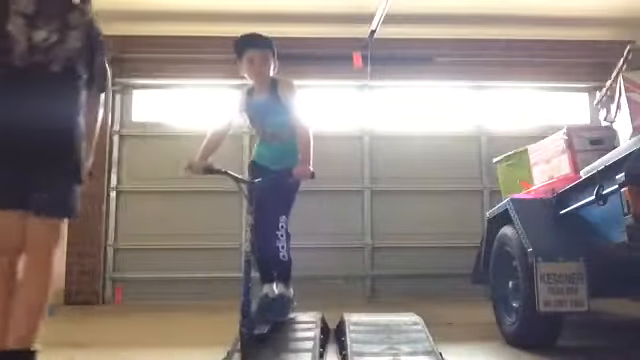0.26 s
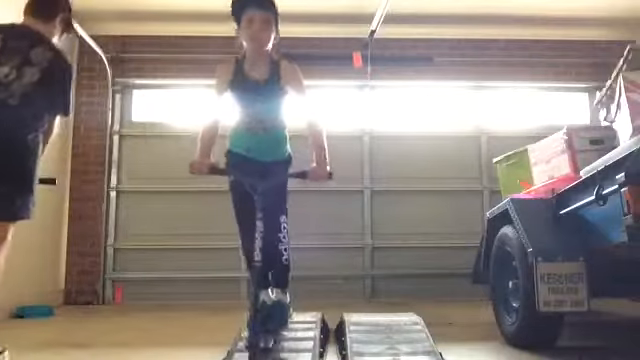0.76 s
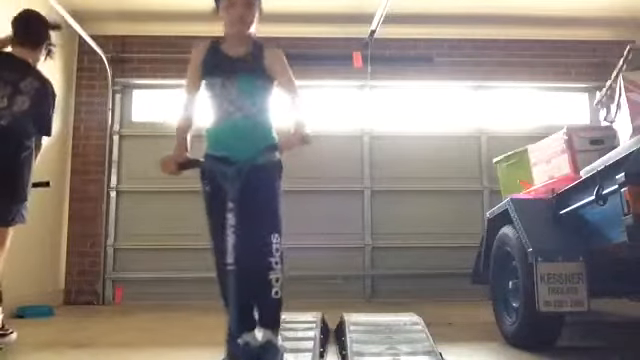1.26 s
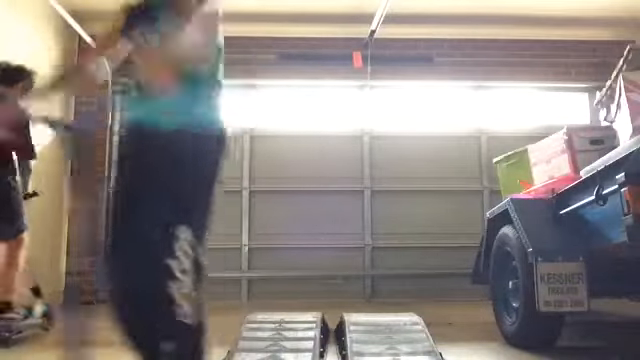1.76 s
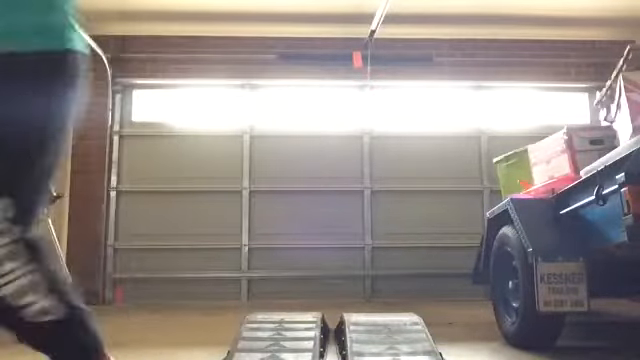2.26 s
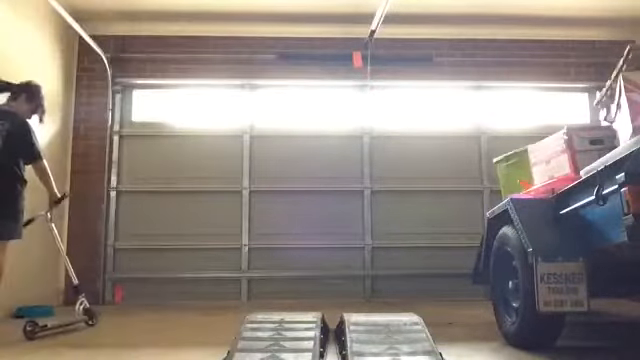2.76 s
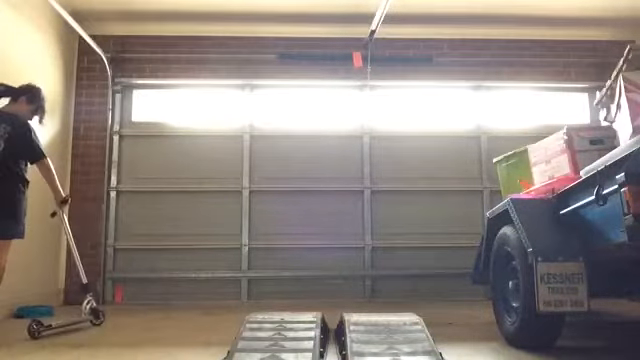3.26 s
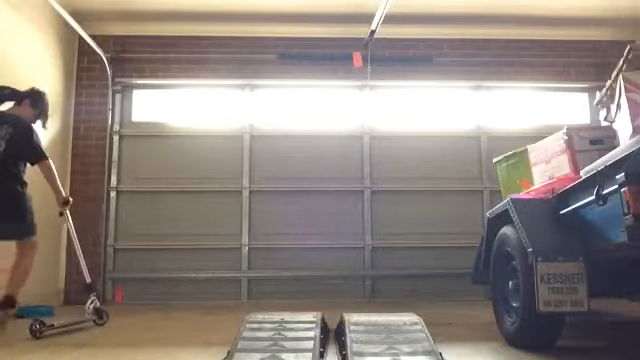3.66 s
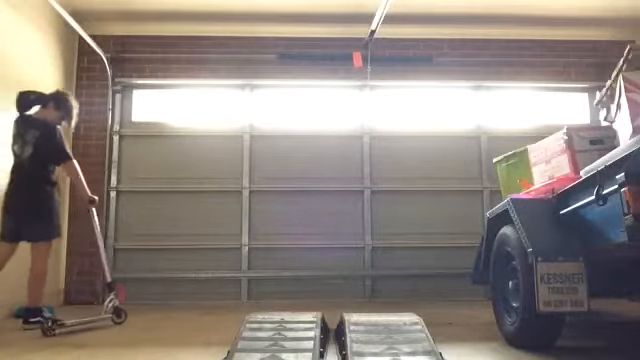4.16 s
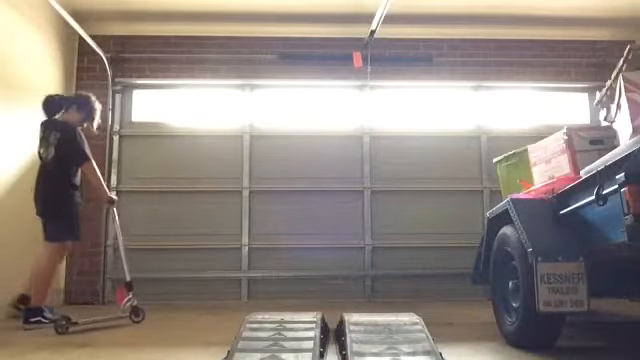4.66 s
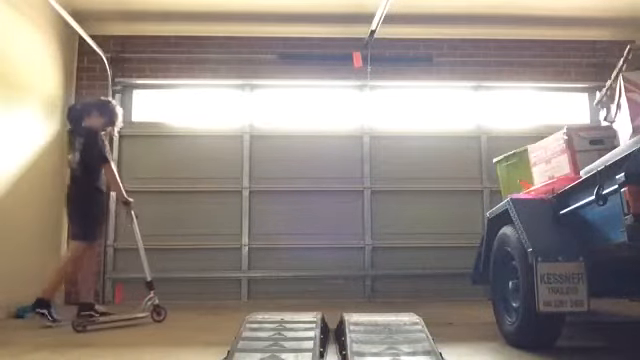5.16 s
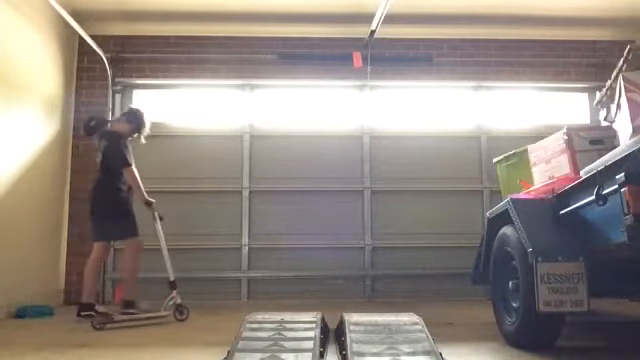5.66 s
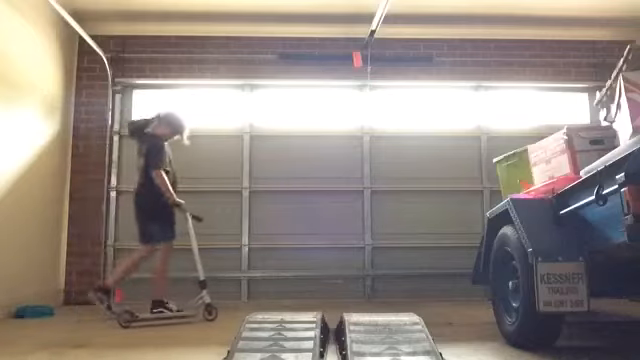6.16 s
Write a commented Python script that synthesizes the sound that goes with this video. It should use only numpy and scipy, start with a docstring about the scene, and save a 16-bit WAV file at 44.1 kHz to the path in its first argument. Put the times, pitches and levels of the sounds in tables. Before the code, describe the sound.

A bare garage with a faint, steady, low hush and about a second of hard-walled echo. From 0 to 0.7 s, a quick run of hollow metal ramp knocks, strongest at first, thins out with soft shoe scuffs. Around 0.85 s a wheel rumbles unevenly over the ramp, swelling into a heavy double clank at 1.2 s with a deep thump through the slab. A softer scuff comes at 1.5 s, a crisp wheel knock at 1.7 s, then a hard, clattering deck hit at 2.43 s with a short thump. Brief bright shoe slides at 2.9 s precede a duller frame knock at 3.35 s and a sharp metallic bang at 3.8 s. After faint scuffs, small slides return at 4.7 and 4.9 s. The loudest late frame bang rings at 5.17 s, then its echo fades into quiet air, faint scuffs and a tiny wheel tick at 6.15 s.

```python
"""In an echoing garage, kick scooters knock on the concrete floor and on hollow metal ramps.
A wheel rolls over a ramp and drops off it, frames are banged down, shoes scuff and slide.
Each short contact is a burst of clicks that rings the thing struck, then fills the bare room.
Low thumps reach the microphone through the slab, and the steady air lies under everything."""
import sys
import numpy as np
from scipy import signal
from scipy.fft import rfft, irfft
from scipy.io import wavfile
from scipy.ndimage import uniform_filter1d

SR = 44100
rng = np.random.default_rng(int(sys.argv[2]) if len(sys.argv) > 2 else 0)


def unload_audio(sound):
    """Save the sound as a 16-bit wav file, at the path given as the first command line argument."""
    columns = np.transpose(np.atleast_2d(sound))
    # keep every value between -1 and 1, then stretch to whole-number steps
    steps = np.round(np.clip(columns, -1, 1) * 32767)
    wavfile.write(sys.argv[1], SR, steps.astype(np.int16))


N = 282571
SIZE = 16384  # samples in one contact or in the roll, about 0.37 s
EDGE_HZ = 15500  # top of the band
WEIGHT_HZ, HARDNESS_HZ = 250, 1000  # weight acts below, hardness above
HOLLOW_HZ, HOLLOW_OCTAVES = 750, 0.77  # centre and spread of the hollow band
HUSH_DB = -59.5  # rms level of the air ahead of the microphone

# The steady air of the garage. Each row: frequency in Hz, relative level in dB per Hz.
HUSH_COLOUR = [(15, -50), (25, -24.5), (75, 5), (152, -2.5), (305, -4.5), (598, -3.5), (666, 0.5),
               (1170, -12), (1450, -5), (2560, -12), (4620, -18), (12200, -27.5), (15500, -35)]

# Contacts on the metal ramp, the shoe scuffs, wheel knocks, deck hits, shoe slides and frame hits.
# Each row: start in seconds, strength in dB, weight (extra bass) in dB, hollowness (extra around
# HOLLOW_HZ) in dB, hardness (extra treble) in dB per octave, contact time in seconds.
RAMP_HITS = [(0.0, -36, -6, 4, -6, 0.018), (0.01, -35.5, -3, -1, -4.5, 0.012),
             (0.029, -38.5, 8, 9.5, 3.5, 0.015), (0.061, -43.5, 13, 1, 6, 0.021),
             (0.127, -40.5, 14, 8.5, 7, .012), (0.191, -45, 25, -20, 5, 0.02),
             (0.25, -49.5, 17, -1, 6, 0.02), (0.299, -48, 2, 2, 4.5, 0.059),
             (0.349, -39.5, 1, -2.5, 0, 0.032), (0.399, -54.5, -19, -2, 7.5, 0.019),
             (0.509, -51.5, 7.5, -1, 3, 0.054), (0.719, -57.5, -30, -4.5, -1, 0.012),
             (1.138, -51, 9, 6, 4, 0.014), (1.17, -44, -4, 8, 3, 0.0072), (1.194, -29.5, 7.5, 7, -6, 0.011),
             (1.22, -24, -3.5, -1.5, -1.5, 0.0077), (1.233, -38.5, -4, -6, -3, 0.016),
             (1.348, -45, -12, -11, -7, 0.043)]
SCUFFS = [(0.138, -45, 15, 1.5, 1, 0.065), (0.389, -40, 24.5, 5.5, -1, 0.033),
          (1.474, -48, 0, -2, -4, 0.038), (1.809, -57.5, -4, 0, 1.5, 0.027), (1.914, -57, -3, 0, -2, 0.035),
          (2.148, -62, 1, -6, 2.5, 0.014), (4.149, -71, 1, -26, 4, 0.041), (4.268, -59.5, 0, 10, 5, 0.036),
          (5.619, -61.5, -7, 3, 3, 0.048), (5.749, -60.5, -16, 3, 1.5, 0.032),
          (5.904, -57, -15, -4.5, 1, 0.023)]
WHEEL_KNOCKS = [(1.716, -39, -6, 5.5, -2.5, 0.0033), (1.734, -37.5, -4.5, 2, -2.5, 0.0018),
                (2.115, -59.5, 5, -4, 0, 0.014), (2.285, -60.5, -21, -3, 1, 0.0076),
                (5.08, -61, -7, 0, -4.5, 0.0035), (6.141, -61, 12.5, -5.5, 6, .0083),
                (6.158, -72, 4, 3, 9, .0074)]
DECK_HITS = [(2.426, -29, 1.5, 0.5, -0.5, 0.0065), (2.444, -33.5, -17, 5.5, 0.5, 0.0039),
             (2.464, -34, -25, -6, -4, 0.0059), (2.494, -40.5, -9, -5.5, -5, 0.01),
             (2.645, -48, -3, 4, 3, 0.017)]
SLIDES = [(2.933, -47, 1.5, 15.5, 0.0086, 0.023), (2.959, -48, -34, 6, 0.0052, 0.014),
          (4.662, -53.5, 3, -5.5, 0.0095, 0.036), (4.684, -51.5, -6, 2, 0.0021, 0.021),
          (4.899, -53, -6.5, 8, 0, 0.028), (4.924, -48, -4.5, -4.5, 0, 0.032)]
FRAME_HITS = [(3.337, -44, 27.5, 2.5, 3, 0.0072), (3.354, -37.5, -5, -2.5, -12, 0.0085),
              (3.374, -45, 0, -1, 0, 0.007), (3.439, -72, -10, 12, -2, 0.0034),
              (3.792, -30.5, -23.5, 1, 0.5, 0.0059), (3.806, -28, -7.5, -3.5, -2.5, .0082),
              (3.894, -46.5, 0, -5, -1, 0.0042), (4.075, -63, 0, -4, 8, 0.0119),
              (5.168, -24.5, 4, -7.5, 1, 0.0066), (5.181, -22.5, -10.5, -6.5, -1, 0.0043),
              (5.204, -34.5, -24, 1.5, -7.5, 0.0082)]

# The ordinary blow of each kind, before ringing. Each row: frequency in Hz, level in dB per octave.
RAMP_BLOW = [(55, -27), (140, -13.5), (330, -11), (720, -11), (1450, -12), (2800, -22.5), (5300, -31),
             (10500, -41)]
SCUFF_BLOW = [(55, -42.5), (140, -19), (330, -15), (720, -10.5), (1450, -15), (2800, -16), (5300, -27),
              (10500, -24.5)]
WHEEL_BLOW = [(55, -16), (140, -26), (330, -11.5), (720, -11), (1450, -12.5), (2800, -19), (5300, -31.5),
              (10500, -40.5)]
DECK_BLOW = [(55, -13), (140, -12), (330, -12), (720, -9), (1450, -12.5), (2800, -8.5), (5300, -16),
             (10500, -25)]
SLIDE_BLOW = [(55, -35.5), (140, -28.5), (330, -22.5), (720, -23), (1450, -22.5), (2800, -13.5),
              (5300, -10.5), (10500, -10)]
FRAME_BLOW = [(55, -47.5), (140, -34), (330, -28.5), (720, -10), (1450, -11), (2800, -11), (3300, -11.5),
              (3550, -15.5), (5300, -18.5), (10500, -29.5)]

# What each thing rings with. Each row: frequency in Hz, width in Hz, dB relative to the plain blow.
RAMP_MODES = [(112, 11.5, 4.5), (155.5, 11.2, 13), (257.5, 9.5, -6), (328, 32, -0.5), (434, 6.4, 9.5),
              (640, 98, 2), (710, 28, 5), (952, 41, 6), (2060, 220, 0.5), (3010, 490, 2)]
SOLE_MODES = [(3620, 4200, 6.3), (5500, 130, 1.3)]
WHEEL_MODES = [(442, 8, 11.6), (587, 46, 5.5), (736, 45, 8.3), (883, 68, 7.5), (1234, 35, 3.1),
               (3090, 45, 5.5)]
DECK_MODES = [(405, 110, 4.8), (672, 48, 11), (924, 60, 6.9), (1455, 136, 12.8), (1910, 58, 2),
              (2925, 87, 3.6), (3300, 13, 2.2), (4470, 21, 10.7), (8140, 530, 3)]
FRAME_MODES = [(274, 71, 5.2), (653, 15, 8), (705, 23, 9.4), (914, 13, 1.3), (1307, 35, 3),
               (1380, 29, 2.67), (1544, 41, 8.7), (2290, 13, 6.8), (2671, 25, 13.2), (2977, 90, 5.4),
               (3033, 40, 6), (3160, 9.6, 4.1), (3270, 11, 5.3), (3650, 14, 8), (3910, 110, 1),
               (4490, 68, 3.7), (5010, 120, 3.6), (5360, 17, 8), (7130, 24, 2.6), (9550, 330, 2.2)]

# A wheel rumbling over the ribs of the ramp. Each row: time in seconds, level in dB.
ROLL_LEVEL = [(0.84, -73), (0.884, -42.5), (0.936, -47), (0.976, -51.5), (1.01, -42), (1.15, -41),
              (1.22, -26)]
# Colour of that rumble. Each row: frequency in Hz, relative level in dB per Hz.
ROLL_COLOUR = [(29, -50), (50, -27), (96, -7.5), (163, -10), (523, -22), (699, -21.5), (1090, -41),
               (3000, -45), (3900, -71), (6600, -120)]

# Low thumps of the heavy blows through the slab.
# Each row: start in seconds, strength in dB, frequency in Hz, time to fall 60 dB in seconds.
SLAB_THUMPS = [(1.226, -7.5, 151, 0.23), (2.428, -12, 154, 0.051), (2.47, -26, 83, 0.064),
               (3.335, -31, 71, 0.1), (5.162, -35.5, 90, .12)]

# Echo of the bare garage. Each row: frequency in Hz, time to fall 60 dB in seconds.
GARAGE_DECAY = [(60, 0.56), (150, 0.35), (350, 0.93), (700, 0.8), (1000, 0.86), (1500, 0.9), (2100, 0.94),
                (2900, 0.89), (3800, 0.84), (5500, 0.69), (8000, 0.55), (14000, 0.34)]

# The microphone's response. Each row: frequency in Hz, gain in dB.
MICROPHONE = [(20, -22), (50, -1.5), (9000, 0), (12500, 1), (15500, -11.5)]


def gain_of(db):
    """Turns dB into a plain gain."""
    return 10 ** (np.asarray(db) / 20)


def evened(x):
    """Scales to rms 1."""
    return x / np.sqrt(np.mean(x ** 2) + 1e-20)


def read(points, hz):
    """Reads a table of frequency and value along a log-frequency axis."""
    f, value = np.transpose(points)
    return np.interp(np.log(hz + 1), np.log(f + 1), value)


def add(mix, start_s, sound):
    """Lays a sound into the mix at its start, cut off where the mix ends."""
    part = mix[round(start_s * SR):][:len(sound)]
    part += sound[:len(part)]


def causal(db):
    """Minimum-phase spectrum for a gain in dB: nothing sounds before the blow."""
    both_sides_db = np.concatenate([db, db[-2:0:-1]])
    log_gain = np.log(gain_of(both_sides_db))
    return np.exp(np.conj(signal.hilbert(log_gain)))[:len(db)]


def body(modes, hz):
    """The plain blow plus one resonance for each mode of the thing struck."""
    return 1 + sum(gain_of(db) / (1 + 2j * (hz - f) / width) for f, width, db in modes)


def contact(row, blow, modes, grit, softness):
    """A short burst of uneven clicks, coloured by the blow and by the modes that it rings."""
    start_s, strength_db, weight_db, hollow_db, hardness_db, contact_s = row
    hz, t = np.fft.rfftfreq(SIZE, 1 / SR), np.arange(SIZE) / SR

    # grit makes the clicks more unequal, softness makes the press build more slowly
    noise, sizes = rng.standard_normal((2, SIZE))
    u = t / max(contact_s, .001)
    press = u ** softness * np.exp(-u * u)
    burst = rfft(noise * np.exp(grit * sizes) * press)
    # the burst's own broad colour is taken out, so that the blow sets it
    lumps_db = 10 * np.log10(uniform_filter1d(abs(burst) ** 2, size=50) + 1e-9)

    weight = weight_db / (1 + (hz / WEIGHT_HZ) ** 2)
    hardness = hardness_db * np.log2(1 + hz / HARDNESS_HZ)
    octaves_off = np.log2((hz + 1) / HOLLOW_HZ)
    hollow = hollow_db * np.exp(-(octaves_off / HOLLOW_OCTAVES) ** 2)
    blow_db = read(blow, hz) + weight + hardness + hollow
    # from dB per octave to dB per Hz, with little passing at the very bottom
    per_hz_db = blow_db - 10 * np.log10(hz + 1)
    colour_db = per_hz_db - 10 * np.log2(1 + (35 / (hz + 1)) ** 2)

    ringing = irfft(burst * causal(colour_db - lumps_db) * body(modes, hz))
    return start_s, gain_of(strength_db) * evened(ringing)


def place(spots, table, *make):
    """Deals the contacts of a table out to the floor spots in turn."""
    for k, row in enumerate(table):
        add(spots[k % len(spots)], *contact(row, *make))


def hush():
    """The steady air of the garage: noise slightly patchy in pitch and time."""
    frames, hz = N // 256 + 5, np.fft.rfftfreq(1024, 1 / SR)
    real, imaginary, patches = rng.standard_normal((frames, 513, 3)).T
    patches = uniform_filter1d(patches, size=12, axis=0)  # along pitch
    patches = evened(uniform_filter1d(patches, size=20, axis=1))  # along time
    colour_db = read(HUSH_COLOUR, hz)[:, None] + 1.7 * patches
    air = signal.istft((real + 1j * imaginary) * gain_of(colour_db), nperseg=1024, noverlap=768)[1]
    return gain_of(HUSH_DB) * evened(air[:N])


def ramp_hits(spots):
    """Knocks on the hollow metal ramp ring its low and middle modes."""
    place(spots, RAMP_HITS, RAMP_BLOW, RAMP_MODES, .5, .7)


def scuffs(spots):
    """Shoes scuff: fairly even clicks with a broad sole resonance."""
    place(spots, SCUFFS, SCUFF_BLOW, SOLE_MODES, .2, .8)


def roll():
    """Irregular bumps under the wheel drum on the ramp."""
    s, level_db = np.transpose(ROLL_LEVEL)
    hz, t = np.fft.rfftfreq(SIZE, 1 / SR), s[0] + np.arange(SIZE) / SR
    bumps = rng.standard_normal(SIZE) * (rng.random(SIZE) < 300 / SR)  # about 300 a second
    drum = evened(irfft(rfft(bumps) * causal(read(ROLL_COLOUR, hz))))
    fade_in = np.clip((t - s[0]) / .02, 0, 1)
    return s[0], drum * gain_of(np.interp(t, s, level_db)) * fade_in


def slab():
    """A low dull push through the concrete: decaying sines, with no echo of the room."""
    out, t = np.zeros(N), np.arange(SIZE) / SR
    onset = 1 - np.exp(-t / 0.0046)
    for start_s, db, hz, t60 in SLAB_THUMPS:
        decay = gain_of(db - 60 * t / max(t60, .02))
        add(out, start_s, -decay * onset * np.sin(2 * np.pi * hz * t))
    return out


def wheel_knocks(spots):
    """Wheels knock, ringing a few modes mostly in the middle range."""
    place(spots, WHEEL_KNOCKS, WHEEL_BLOW, WHEEL_MODES, .4, .6)


def deck_hits(spots):
    """Hits on a deck: very uneven clicks ring modes from middle to treble."""
    place(spots, DECK_HITS, DECK_BLOW, DECK_MODES, .7, 1.3)


def slides(spots):
    """Shoes slide: bright bursts that start abruptly and ring the sole."""
    place(spots, SLIDES, SLIDE_BLOW, SOLE_MODES, .45, .35)


def frame_hits(spots):
    """Frames banged down ring many modes, crowded into the treble."""
    place(spots, FRAME_HITS, FRAME_BLOW, FRAME_MODES, .6, 1.2)


def garage(x, direct_db, build_s):
    """Direct sound, then random reflections that thicken and die band by band."""
    taps = np.zeros(2 * SR)
    at = np.arange(100, 2 * SR - 10, 10)
    taps[at + rng.integers(0, 10, len(at))] = rng.choice([-1., 1.], len(at))
    hz, t, z = signal.stft(taps, SR, nperseg=512)
    decay = gain_of(-60 * t / read(GARAGE_DECAY, hz)[:, None])
    tail = signal.istft(z * decay, SR, nperseg=512)[1]

    # near walls answer early and strongly, in uneven clumps
    t = np.arange(len(tail)) / SR
    clumps_db = 3.3 * evened(uniform_filter1d(rng.standard_normal(len(t)), size=300))
    early = gain_of((8.0 + clumps_db) * np.exp(-t / 0.1))
    tail = tail * (1 - np.exp(-t / build_s)) * early

    # the random tail's own broad colour is evened out, so that no pitch region stands out by chance
    echo = rfft(tail)
    lumps_db = 10 * np.log10(uniform_filter1d(abs(echo) ** 2, size=80))
    tail = irfft(echo * causal(-lumps_db))
    tail = tail / np.linalg.norm(tail)
    tail[0] = gain_of(direct_db)  # relative to the whole echo
    return signal.fftconvolve(x, tail)[:N]


def scene():
    """Contacts happen at four spots on the floor, each spot with its own echoes."""
    spots = np.zeros((4, N))
    for source in (ramp_hits, frame_hits, deck_hits, wheel_knocks, scuffs, slides):
        source(spots)
    add(spots[0], *roll())
    room = sum(garage(x, -9, 0.00091) for x in spots)
    return (room + slab() + hush())[None]


def record(dry):
    """The microphone thins the lowest bass and dulls the top treble; then the band limit."""
    hz = np.fft.rfftfreq(8192, 1 / SR)
    response = irfft(causal(read(MICROPHONE, hz)))
    heard = signal.oaconvolve(dry, response[None])[:, :N]
    band = signal.firwin(511, EDGE_HZ, window=("kaiser", 9), fs=SR)
    return signal.oaconvolve(heard, band[None], "same")


dry = scene()
out = record(dry)
unload_audio(out)
```